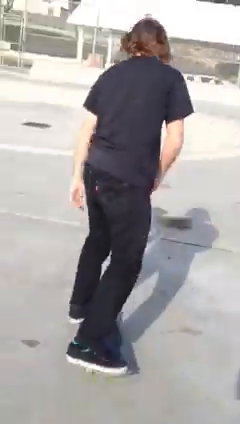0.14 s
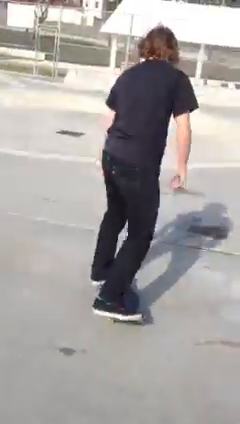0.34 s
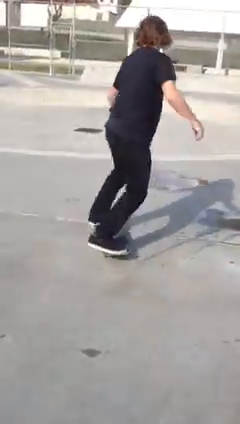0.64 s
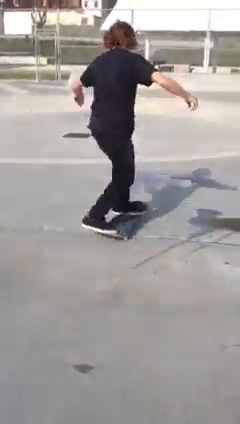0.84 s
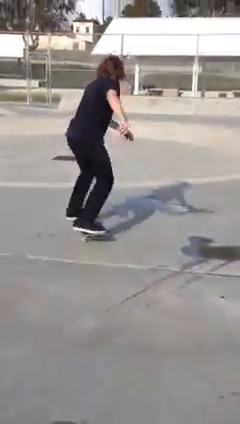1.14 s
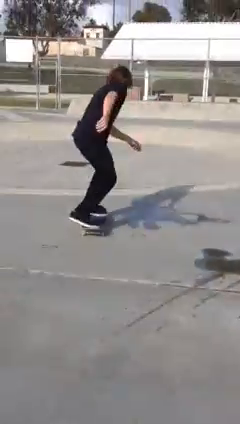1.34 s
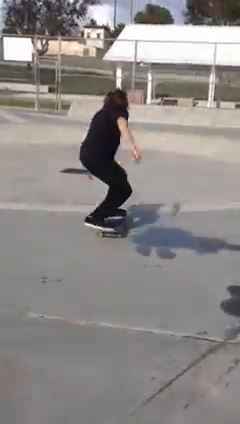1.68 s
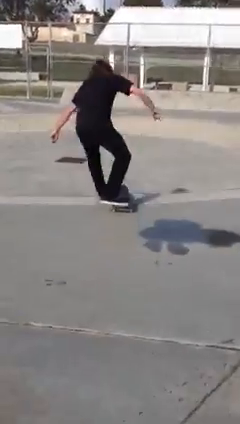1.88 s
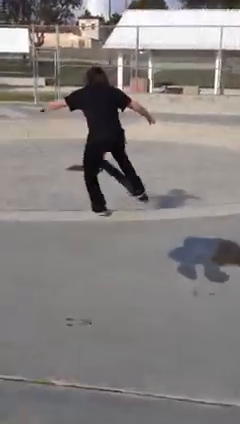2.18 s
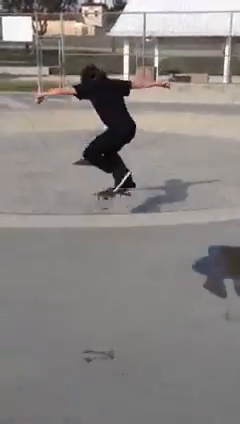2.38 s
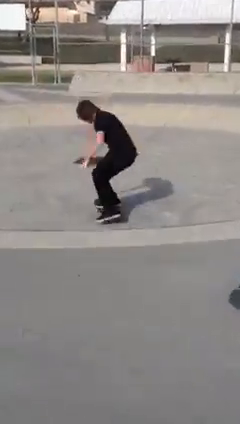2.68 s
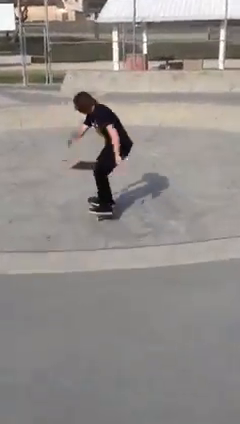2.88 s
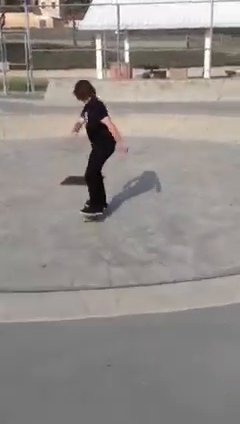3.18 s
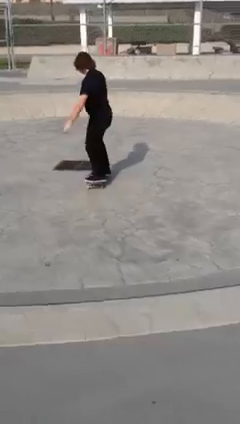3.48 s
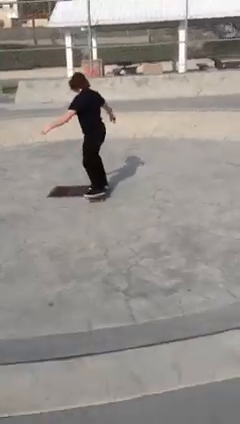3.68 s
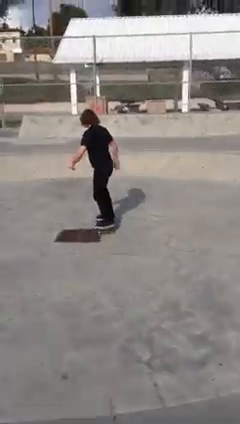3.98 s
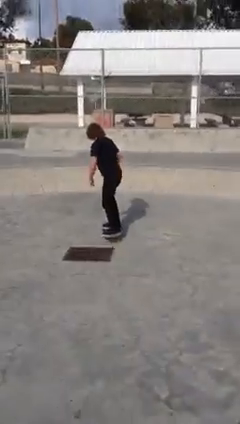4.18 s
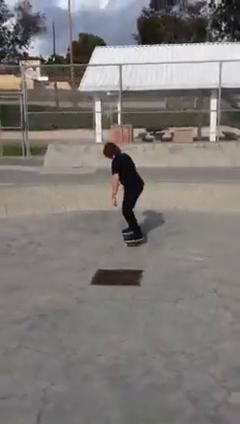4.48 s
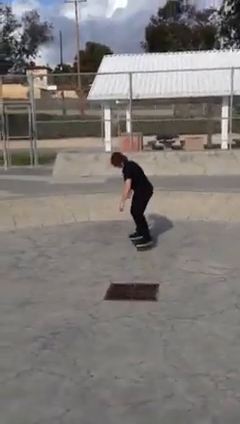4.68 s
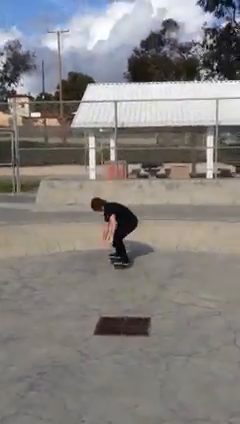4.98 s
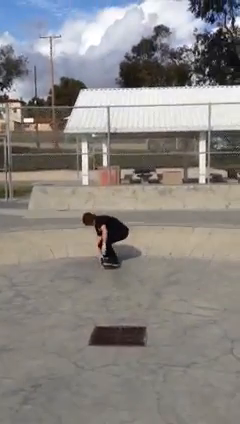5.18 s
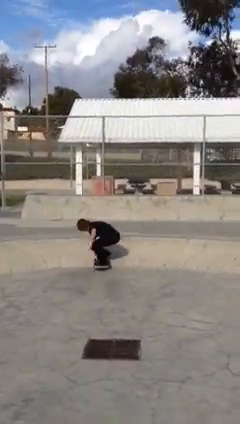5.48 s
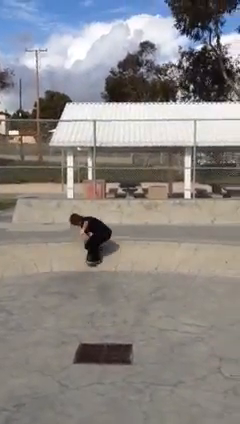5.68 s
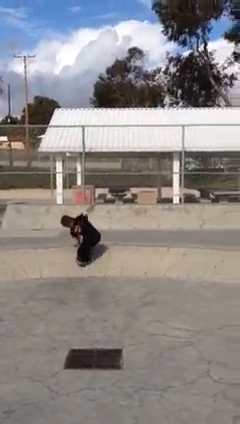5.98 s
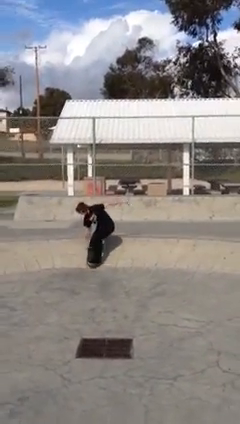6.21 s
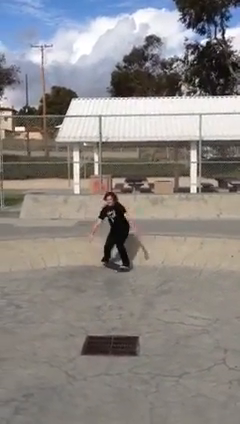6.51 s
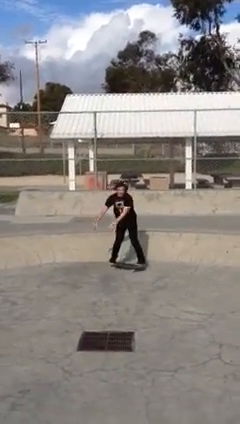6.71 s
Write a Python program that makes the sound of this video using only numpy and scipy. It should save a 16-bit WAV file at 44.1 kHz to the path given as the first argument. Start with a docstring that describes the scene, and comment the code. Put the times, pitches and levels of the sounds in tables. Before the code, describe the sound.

Hard skateboard wheels rumble over concrete, clacking across joints, then a popped trick, a sharp landing, a metallic grate rattle and a fading, skidding turn.

```python
"""Hard wheels rumble on concrete close by, then clack over joints as a skateboard rolls off over a skatepark.
It pops a trick, lands, rattles over a drain grate into a shallow bowl and turns on the far bank, wheels skidding.
The rolling is random grit filtered by surface and deck; each blow is chatter with a few struck modes.
The phone stands in the open: puffs of wind on its microphone, a low outdoor murmur, and faint echo off the banks.
"""
import sys
import numpy as np
from scipy import signal
from scipy.fft import rfft, irfft
from scipy.io import wavfile

SR = 44100
rng = np.random.default_rng(int(sys.argv[2]) if len(sys.argv) > 2 else 0)


def store_pcm(level_fs):
    """Save levels as 16-bit WAV."""
    pcm = np.round(np.clip(level_fs, -1, 1) * 32767).astype(np.int16)
    wavfile.write(sys.argv[1], SR, np.atleast_2d(pcm).T)


N = 302085
TIME = np.arange(N) / SR

# short wind puffs on the microphone: start_s, length_s, level_db
WIND_PUFFS = [(3.089, 0.032, -35), (3.28, 0.11, -39), (3.36, 0.11, -38.5), (3.485, 0.17, -41.5),
              (4.89, 0.046, -42), (5.078, 0.041, -33.5), (5.203, 0.04, -39), (5.246, 0.025, -30),
              (5.798, 0.044, -46), (5.92, 0.11, -54), (6.085, 0.017, -37.5)]
# spectrum of a puff: pitch_hz, level_db
PUFF_SPECTRUM = [(25, -51), (60, -17.5), (110, -1), (170, 0.5), (250, -5.5), (350, -15), (600, -42)]
# distant traffic and breeze: pitch_hz, level_db
AIR_SPECTRUM = [(25, -22), (60, -16), (115, 5), (170, 7.5), (250, -16.5), (350, -27.5), (700, -16.5),
                (1200, -16.5), (2500, -28.5), (6000, -28.5), (15000, -39)]
# colour of the microphone's port: pitch_hz, level_db
PORT_RESPONSE = [(20, -5.5), (4700, 1), (5080, -6.5), (5800, -1), (9400, 5), (10200, -6), (11200, -4),
                 (13000, 1.5), (16000, 4)]
TOP_HZ = 15500
BANK_ECHO_S, BANK_ECHO_DB = 0.047, -25.5  # one distinct reflection from the nearest bank

# turning rate of the wheels, which paces their throb: time_s, turns_per_s
WHEEL_TURNS = [(0, 15), (2.5, 15), (4, 19), (5.2, 17), (6, 4), (6.85, 12)]
# rumble along the ride, shaped by speed, distance and coarseness of slab: time_s, level_db
RUMBLE_LEVEL = [(0, -39), (0.27, -40), (0.43, -47), (0.65, -43), (0.8, -46.5), (1.35, -46.5), (1.5, -44),
                (1.76, -43.5), (2.0, -32.5), (2.25, -34), (3.2, -39.5), (3.55, -34), (3.78, -37),
                (3.97, -47), (4.4, -40), (4.63, -47), (4.95, -42), (5.12, -55.5), (5.7, -50), (6.02, -67.5),
                (6.35, -46.5), (6.85, -57.5)]
# bearing hiss, fading with distance and dying where the board stalls on the bank: time_s, level_db
HISS_LEVEL = [(0, -56.5), (1.3, -54), (1.55, -55.5), (2.3, -58), (2.75, -58.5), (3.4, -56), (4.0, -61.5),
              (5.1, -64.5), (5.7, -63.5), (5.95, -77), (6.13, -69), (6.4, -57.5), (6.85, -61.5)]
# the rider leans and the treads scrub: middle_s, length_s, extra_hiss_db
LEANS_IN = [(0.21, 0.25, 4), (0.667, 0.1, 4), (2.0, 0.57, 4), (3.182, 0.053, 4), (4.24, 0.073, 3.5),
            (4.343, 0.085, 14.5), (4.826, 0.082, 14.5)]
# rumble on the first slab, close to the phone: pitch_hz, level_db
NEAR_RUMBLE = [(170, -37), (215, 3), (250, -3.5), (292, 5.5), (360, -15.5), (445, 8.5), (520, -2.5),
               (590, 7.5), (630, 4), (680, 8), (750, -2.5), (820, -2), (890, 4.5), (1020, 1.5),
               (1130, -2.5), (1480, -3.5), (1800, -15), (2250, -21), (2520, -9), (2700, -34)]
# rumble of wheels and deck on the flat: pitch_hz, level_db
FLAT_RUMBLE = [(290, -28), (385, 6.5), (460, 1), (560, -2), (690, 0.5), (780, 1.5), (860, -8.5), (950, -5),
               (1030, -8.5), (1150, -3), (1400, -13.5), (1800, -23), (2600, -23)]
# rumble on the floor of the bowl: pitch_hz, level_db
BOWL_RUMBLE = [(140, -8), (190, -3.5), (280, -17), (385, 6.5), (480, 6.5), (560, 3.5), (655, 8), (760, 2.5),
               (880, -4.5), (960, 2), (1070, -4), (1240, -2.5), (1450, -8), (1700, -14.5), (1900, -29),
               (2600, -20)]
# middles of the fades from near to flat rumble and from flat to bowl, and the length of each
NEAR_END_S, BOWL_S, SLAB_FADE_S = 1, 3.26, 0.8
# low boom of the deck under the rider: pitch_hz, level_db
BOOM_SPECTRUM = [(60, -91.5), (120, -14), (170, 1), (230, 3.5), (300, 3.5), (360, 0.5), (480, -7.5)]
# grit crushed under the wheels: pitch_hz, level_db
GRIND_SPECTRUM = [(1100, 2.5), (1500, 4), (1750, 5), (1980, -4), (2150, 0.5), (2500, -7.5), (3000, -6.5),
                  (3700, -17), (4600, -7.5), (5600, -24.5)]
# hiss of bearings and wheel treads: pitch_hz, level_db
HISS_SPECTRUM = [(3500, 2.5), (5000, 0), (6400, 1.5), (7500, -3.5), (9000, -5), (10500, -5), (13000, -7),
                 (15500, -19.5)]
# the boom sits below the rumble and swells as the rider loads the deck for the trick
BOOM_DB, CROUCH_S, CROUCH_LENGTH_S, CROUCH_DB = -5, 1.86, 0.38, 6.5
GRIND_DB, GRIND_HISS_SHARE = -3, 0.5  # offset from a level midway between rumble and hiss
HISS_FLUTTER_DB, HISS_FLUTTER_PER_S = 1.1, 35
SURGE_DB, SURGES_PER_S = 1.1, 16  # patches of coarser concrete

# ringing of the spinning bearings: pitch_hz, level_db
WHIRR_SPECTRUM = [(3100, -25), (3400, -8), (3600, -8), (3800, -19.5), (4200, -17), (4550, -12), (4800, -6),
                  (5300, -18)]
WHIRR_S, WHIRR_LENGTH_S, WHIRR_DB = 1.61, 0.4, -52.5  # loudest on the run-up to the trick
# treads scrubbing with a fine, high hiss: start_s, length_s, level_db
TREAD_SCRUBS = [(4.205, 0.04, -63), (4.305, 0.085, -57), (4.785, 0.13, -65)]
# spectrum of the scrub: pitch_hz, level_db
SCRUB_SPECTRUM = [(6000, -18), (10000, -3), (12000, 4), (15000, -3)]
# wheels skidding sideways: start_s, length_s, rasp_level_db, hiss_relative_to_rasp_db
WHEEL_SKIDS = [(2.014, 0.054, -26.5, -33), (2.055, 0.082, -41, -4.5), (5.654, 0.055, -47, -7.5),
               (6.331, 0.058, -46, -7.5), (6.439, 0.07, -40.5, -2), (6.49, 0.07, -51.5, 0)]
# rasp of a skidding wheel: pitch_hz, level_db
RASP_SPECTRUM = [(150, -30), (280, 3), (500, 5.5), (1000, 2), (2000, -4.5), (2800, -14), (4000, -26),
                 (6000, -39)]

# modes of the deck with its trucks: pitch_hz, level_db, t60_s
DECK_MODES = [(228, -10, 0.051), (470, 8, 0.055), (541, -1.5, 0.1), (674, 2, 0.043), (745, 7.5, 0.021),
              (1011, -3.5, 0.12), (1172, -3, 0.12), (1530, 9, 0.033), (1746, 11.5, 0.025),
              (2125, 6.5, 0.02), (2534, 2, 0.078), (2965, -9, 0.086), (3460, 4, 0.09), (4500, 13, 0.032)]
# wheels and tail striking concrete: start_s, body_level_db (over 10 ms), contact_s, main_ring_hz,
# second_ring_hz, second_ring_db (relative to main ring), then thud_db, crack_db, tick_db
# (relative to the body; crack and tick are lowered further by fixed trims in knock)
CONCRETE_BLOWS = [(0.3235, -26, 0.011, 580, 1030, -4, -24, -2, -18),
                  (0.337, -19, 0.0065, 606, 1497, -7, -30, -7.5, -19.5),
                  (0.346, -27, 0.0066, 1460, 700, -11, -10, -2.5, -14),
                  (0.665, -22.5, 0.014, 614, 1250, -2, -10, -4, -12),
                  (0.675, -15.5, 0.0025, 636, 1260, -9.5, -17, -9.5, -19.5),
                  (0.711, -23.5, 0.021, 640, 462, -10, -11, -7.5, -18),
                  (0.8327, -24, 0.007, 1035, 570, -13, -8, -1, -1.5),
                  (0.841, -21, 0.0025, 1570, 1366, -5, -5, -1.5, 0.5),
                  (0.871, -36, 0.003, 903, 1500, -2, -9, -1, -6),
                  (0.9653, -10, 0.006, 549, 2130, -6.5, -9.5, -4.5, -8.5),
                  (1.053, -14, 0.0069, 990, 1500, -3.5, -28, -4.5, -6.5),
                  (1.063, -27.5, 0.011, 485, 723, 6, -12, -2, -1),
                  (1.253, -37, 0.017, 616, 1100, -3, -10, 2.5, -4),
                  (1.2722, -28.5, 0.0018, 1300, 653, -6, -11, -5, -13),
                  (1.413, -24, 0.018, 1030, 690, -3, -17, -4, -9),
                  (1.442, -34.5, 0.002, 1070, 1530, -4, -7, -2, -6),
                  (1.922, -26, 0.0052, 447, 300, 0, -5, -9, -15),
                  (1.963, -23.5, 0.015, 445, 715, -9, -2.5, -11.5, -29),
                  (2.021, -26.5, 0.0087, 594, 1400, -10, -22, -13, -31),
                  (2.045, -20, 0.03, 600, 773, -2, -24, -7, -13),
                  (2.079, -22, 0.0091, 433, 595, -11, -10, -7, -22),
                  (2.0907, -22, 0.01, 980, 1750, -20, -6, 8, -10),
                  (2.148, -25.5, 0.026, 1030, 2870, -16, -15, 1, -8.5),
                  (2.5477, -12, 0.006, 728, 912, -3, -15, -4, -17),
                  (2.5935, -22, 0.012, 684, 940, -8, -9, -4, -6.5),
                  (2.613, -17, 0.011, 910, 332, -1.5, -10, -5, -12.5),
                  (3.132, -36, 0.0083, 373, 915, 1, -10, -14, -8.5),
                  (4.17, -43.5, 0.006, 595, 990, -12, -26, -8.5, -6),
                  (4.905, -39.5, 0.0052, 485, 1110, -4, -9, -2.5, -8),
                  (5.505, -26, 0.005, 397, 1080, -8, -11, -7.5, -14),
                  (5.511, -27, 0.0025, 480, 770, -22, -10, -6, -16),
                  (5.537, -42.5, 0.0089, 500, 1600, -17, -2, -9, -11),
                  (5.671, -23, 0.012, 825, 457, -8, -22, -7.5, -11),
                  (6.029, -58, 0.011, 670, 1190, -8, -15, 5, -1),
                  (6.334, -33.5, 0.0054, 470, 760, 0, -21, -7.5, -4),
                  (6.346, -27.5, 0.008, 776, 425, -4, -18.5, -14, -11),
                  (6.372, -43, 0.01, 670, 990, -3, -13, -8, -3),
                  (6.427, -41, 0.008, 715, 1110, -11, -14, -2, -1),
                  (6.483, -27, 0.011, 495, 406, 1, -10, -2.5, 0.5),
                  (6.513, -40, 0.0044, 607, 1000, -9, -20, -3, 4.5),
                  (6.521, -34, 0.007, 623, 830, -5, -19, -7, -5),
                  (6.837, -28.5, 0.012, 647, 1155, -4, -16, -2.5, 0)]
# wheels dropping on and off the drain grate: same columns
GRATE_BLOWS = [(3.5876, -9.5, 0.0094, 425, 680, -1, -8.5, -9, -23.5),
               (3.603, -14.5, 0.0058, 516, 1210, -1, -4.5, -2, -25),
               (3.632, -16.5, 0.0083, 440, 298, 2, -15, -13, -29),
               (3.641, -21, 0.0052, 605, 278, 4, -22, -7, -24),
               (3.654, -21.5, 0.018, 560, 453, 3, -13, -11, -27),
               (3.739, -33, 0.0073, 380, 940, -1, -12, -4.5, -6),
               (3.816, -27, 0.007, 627, 956, -7, -1, -6.5, -26),
               (3.851, -25.5, 0.0048, 634, 437, -12, -5, -9, -29),
               (3.8777, -18.5, 0.0069, 607, 454, -4, -5, -5.5, -25),
               (3.888, -16.5, 0.0018, 687, 790, -11, -7, -11.5, -34),
               (3.914, -47, 0.006, 624, 445, 22, -9, -11, -9)]
# modes of the iron drain grate: pitch_hz, level_db, t60_s
IRON_MODES = [(298, -4, 0.21), (430, -3, 0.073), (617, -1.5, 0.21), (697, -1, 0.053), (965, 3, 0.083),
              (2130, -8, 0.049)]
GRATE_RING_DB = -7.5  # first grate ring, relative to its blow
GRATE_RING_FADE_DB_PER_S = -23  # the grate rings less as the wheels leave it
# timbre shared by pebbles: second_ring_hz, second_ring_db, thud_db, crack_db, tick_db
PEBBLE_SOUND = (1100, -6, -14, -5, -9)
PEBBLES_PER_S, PEBBLE_DB, PEBBLE_SPREAD_DB = 7, -6, 3  # level relative to the rumble
PEBBLE_CONTACT_S = 0.004
REACH_HZ, REACH_OCTAVES_PER_DB = 2890, 0.04  # a louder crack also reaches higher
# the whole board flexes slowly; its bending modes die fast
THUD_HZ, THUD_T60_S, RING_T60_S = 235, 0.025, 0.029
MID_RING_HZ = 640  # the deck's usual ring
RING_DAMPING = 0.77  # higher bending modes die sooner, by this power of their pitch


def undb(db):
    """Decibels to gain."""
    return 10 ** (np.asarray(db) / 20)


def unit(x):
    """Scale to rms 1."""
    return x / np.sqrt(np.mean(x ** 2) + 1e-20)


def colour(x, points):
    """Filter by a spectrum of (Hz, dB) points, falling away beyond its two ends."""
    hz, db = np.transpose(points)
    f = np.maximum(np.fft.rfftfreq(len(x), 1 / SR), 1)
    gain = undb(np.interp(np.log(f), np.log(hz), db))
    low_end = np.minimum(f / hz[0], 1) ** 2
    high_end = np.minimum(hz[-1] / f, 1) ** 2
    return irfft(rfft(x) * gain * low_end * high_end, len(x))


def band(x, lo_hz, hi_hz, order=3):
    """Causal band-pass."""
    edges = [lo_hz, min(hi_hz, SR / 2 - 1000)]
    return signal.sosfilt(signal.butter(order, edges, "band", fs=SR, output="sos"), x)


def ring(t, hz, t60):
    """One struck mode, of equal energy whatever its decay."""
    decay = np.exp(-np.log(1000) * t / t60)
    return np.sin(2 * np.pi * hz * t) * decay * np.sqrt(4 * np.log(1000) / (t60 * SR))


def bend(t, hz, t60, rise_s):
    """A mode that builds up while the blow pushes on it, at rms 1."""
    return unit(ring(t, hz, t60) * (1 - np.exp(-t / rise_s)))


def walk(rate):
    """Random wander of rms 1, with this many straight steps a second."""
    knots = rng.standard_normal(4096)
    return unit(np.interp(TIME * rate, np.arange(len(knots)), knots))


def grit(spread_db, rate):
    """Dense tiny impacts, mostly small and now and then large."""
    hits = rng.random(N) < rate / SR
    size_db = spread_db * np.minimum(rng.exponential(size=N), 4)
    return hits * rng.standard_normal(N) * undb(size_db)


def curve(points):
    """A control joined by straight lines in time."""
    return np.interp(TIME, *np.transpose(points))


def swell(middle, length):
    """A smooth rise to 1 and back, this long at half height."""
    return np.exp(-(2 * (TIME - middle) / length) ** 2 * np.log(2))


def gate(start, length, edge):
    """A burst with sloping edges."""
    opening = np.clip((TIME - start) / edge + .5, 0, 1)
    return opening * np.clip((start + length - TIME) / edge + .5, 0, 1)


def add(out, start, x):
    """Mix x in at a time."""
    i = int(start * SR)
    out[i:i + len(x)] += x[:max(N - i, 0)]


def wind():
    """Short eddies brush the microphone over the wavering low murmur of the outdoors."""
    puffs = sum(gate(s, length, 0.034) * undb(db) for s, length, db in WIND_PUFFS)
    eddies = unit(colour(rng.standard_normal(N), PUFF_SPECTRUM)) * puffs
    murmur = unit(colour(rng.standard_normal(N), AIR_SPECTRUM)) * undb(-54.5 + 0.4 * walk(1.03))
    return eddies + murmur


def park(x, echo_db, t60, dull_hz):
    """Sparse reflections from the concrete banks, duller than the direct sound."""
    t = np.arange(SR) / SR
    taps = rng.standard_normal(SR) * (rng.random(SR) < .03)
    taps *= np.clip((t - .012) / 0.0064, 0, 1) * np.exp(-np.log(1000) * t / t60)
    taps = band(taps / np.sqrt(np.sum(taps ** 2)), 204, dull_hz, order=1)
    out = x + undb(echo_db) * signal.fftconvolve(x, taps)[:N]
    add(out, BANK_ECHO_S, undb(BANK_ECHO_DB) * band(x, 510, 1050, order=2))
    return out


def treble_lift(x, start_db, end_db):
    """The highest treble of the board is lifted by a gain that drifts slowly over the ride."""
    top = colour(x, [(7000, -40), (9000, -12), (11000, 0), (SR / 2, 0)])
    lift_db = np.interp(TIME, [0, TIME[-1]], [start_db, end_db])
    return x + top * (undb(lift_db) - 1)


def whirr_and_scrub():
    """The bearings ring on the run-up; the treads hiss unevenly as the rider carves across the bowl."""
    whirr = unit(colour(rng.standard_normal(N), WHIRR_SPECTRUM))
    whirr *= undb(WHIRR_DB) * swell(WHIRR_S, WHIRR_LENGTH_S)
    scrub = unit(colour(grit(2.0, 3000), SCRUB_SPECTRUM)) * undb(1.8 * walk(110))
    carves = sum(undb(db) * swell(s + length / 2, length) for s, length, db in TREAD_SCRUBS)
    return whirr + scrub * carves


def slabs():
    """Coarse grains drum on the wheels; each stretch of concrete brings out other resonances."""
    near = np.clip((NEAR_END_S - TIME) / SLAB_FADE_S + .5, 0, 1)
    bowl = np.clip((TIME - BOWL_S) / SLAB_FADE_S + .5, 0, 1)
    flat = np.maximum(1 - near - bowl, 0)
    stretches = (near, NEAR_RUMBLE), (flat, FLAT_RUMBLE), (bowl, BOWL_RUMBLE)
    return sum(np.sqrt(share) * unit(colour(grit(1.5, 2200), points)) for share, points in stretches)


def rolling():
    """Concrete grains drum on the wheels; the load throbs with each wheel turn and wanders with the surface."""
    rumble_db = curve(RUMBLE_LEVEL)
    lean_db = sum(db * swell(s, length) for s, length, db in LEANS_IN)
    hiss_db = curve(HISS_LEVEL) + lean_db + HISS_FLUTTER_DB * walk(HISS_FLUTTER_PER_S)
    boom_db = rumble_db + BOOM_DB + CROUCH_DB * swell(CROUCH_S, CROUCH_LENGTH_S)
    grind_db = rumble_db + GRIND_HISS_SHARE * (hiss_db - rumble_db) + GRIND_DB

    wheel_phase = 2 * np.pi * np.cumsum(curve(WHEEL_TURNS)) / SR
    load_db = .6 * np.sin(wheel_phase) + .6 * walk(90)
    surge_db = SURGE_DB * walk(SURGES_PER_S)

    rumble = slabs() * undb(rumble_db + load_db + surge_db)
    boom = unit(colour(grit(1.4, 3000), BOOM_SPECTRUM)) * undb(boom_db + load_db)
    grind = unit(colour(grit(1.0, 7000), GRIND_SPECTRUM)) * undb(grind_db + load_db + surge_db)
    hiss = unit(colour(grit(2.0, 16000), HISS_SPECTRUM)) * undb(hiss_db + load_db)
    return rumble + boom + grind + hiss


def skids():
    """Urethane sticks and slips over the concrete in uneven jerks."""
    rasp = unit(colour(grit(0.64, 2500), RASP_SPECTRUM))
    hiss = unit(colour(grit(1.8, 9850), HISS_SPECTRUM))
    jerks = undb(3 * walk(190))
    bursts = sum(gate(s, length, 0.017) * undb(db) * (rasp + undb(hiss_db) * hiss)
                 for s, length, db, hiss_db in WHEEL_SKIDS)
    return jerks * bursts


def contact(t, hold_s, fall_s, tail_db, tail_s):
    """Wheels, trucks and deck chatter for some ms with an even, broad spectrum; loose hardware buzzes out."""
    attack = np.minimum(t / 0.0009, 1)
    press = np.exp(-np.maximum(t - hold_s, 0) / fall_s)
    buzz = undb(tail_db) * np.exp(-t / tail_s)
    force = rfft(attack * (press + buzz) * rng.choice([-1., 1.], len(t)))
    evened = irfft(force / (np.abs(force) + 1e-9) ** .7, len(t))
    return evened * attack * np.exp(-t / .03)


def knock(contact_s, ring_hz, second_hz, second_db, thud_db, crack_db, tick_db):
    """One blow: a thud of the deck, its woody ring, the crack of hard wheels and a tick of metal and grit."""
    t = np.arange(SR // 5) / SR
    hold_s = max(contact_s, .002)
    # deck modes vary slightly in pitch at random from blow to blow
    deck = sum(undb(db) * ring(t, hz * (1 + 0.012 * rng.standard_normal()), t60)
               for hz, db, t60 in DECK_MODES)
    chatter = contact(t, .9 * hold_s, fall_s=.0017, tail_db=-17, tail_s=.01)
    deck_reply = signal.fftconvolve(chatter, unit(deck) / np.sqrt(len(t)))[:len(t)]
    wood = chatter + 0.24 * deck_reply
    # where the blow lands decides which two bending modes ring most
    pitches_hz = np.array([ring_hz, second_hz])
    main_t60, second_t60 = RING_T60_S * (MID_RING_HZ / pitches_hz) ** RING_DAMPING
    main_ring = bend(t, ring_hz, main_t60, 0.49 * hold_s)
    second_ring = undb(second_db) * bend(t, second_hz, second_t60, 0.46 * hold_s)
    body = unit(unit(band(wood, 443, 1063)) + 1.35 * (main_ring + second_ring))
    thud = unit(band(bend(t, THUD_HZ, THUD_T60_S, rise_s=0.016), 130, 380, order=2))
    # a harder contact reaches higher modes
    reach_hz = REACH_HZ * 2 ** (REACH_OCTAVES_PER_DB * crack_db)
    crack = unit(band(band(wood, 1513, 7300), 300, reach_hz))
    grains = contact(t, .85 * hold_s, fall_s=.002, tail_db=-16, tail_s=.013)
    tick = unit(band(band(grains, 5000, 14300), 3400, 6360, order=1))
    blow = body + undb(thud_db) * thud + undb(crack_db - 4.14) * crack + undb(tick_db - 6.5) * tick
    return blow * np.sqrt(SR / 100 / len(t))  # level counted over 10 ms


def pebbles():
    """Stray pebbles and hairline cracks tick under the wheels at random, some dB below the rumble."""
    out, rumble_db = np.zeros(N), curve(RUMBLE_LEVEL)
    for when, size, pitch in rng.random((int(PEBBLES_PER_S * N / SR), 3)):
        i = int(when * N)
        db = rumble_db[i] + PEBBLE_DB + PEBBLE_SPREAD_DB * (2 * size - 1)
        ring_hz = MID_RING_HZ * 2 ** (pitch - .5)
        add(out, TIME[i], undb(db) * knock(PEBBLE_CONTACT_S, ring_hz, *PEBBLE_SOUND))
    return out


def grate_ring():
    """The iron bars of the drain grate ring on in slightly detuned modes after one blow."""
    t = np.arange(SR // 3) / SR
    iron = sum(undb(db) * bend(t, hz * (1 + .015 * rng.standard_normal()), t60, .004)
               for hz, db, t60 in IRON_MODES)
    return unit(iron) * np.sqrt(SR / 100 / len(t))  # level counted over 10 ms


def clacks():
    """Joints in the slab, the popped tail, the landings and the turn strike the deck; the grate rings on."""
    out = np.zeros(N)
    for s, db, *timbre in CONCRETE_BLOWS + GRATE_BLOWS:
        add(out, s, undb(db) * knock(*timbre))
    first_s = GRATE_BLOWS[0][0]
    for s, db, *_ in GRATE_BLOWS:
        ring_db = db + GRATE_RING_DB + GRATE_RING_FADE_DB_PER_S * (s - first_s)
        add(out, s, undb(ring_db) * grate_ring())
    return out


def scene():
    """The board and the air around the phone; blows, skids and pebbles echo off the banks, the rolling does not."""
    struck = park(clacks() + skids() + pebbles(), echo_db=-18, t60=0.21, dull_hz=1860)
    board = rolling() + whirr_and_scrub() + struck
    return (treble_lift(board, start_db=0.5, end_db=1) + wind())[None]


def record(dry):
    """The microphone's port colours the sound, the loudest peaks are rounded and the top is cut."""
    heard = np.array([colour(channel, PORT_RESPONSE) for channel in dry])
    ceiling = 0.98
    rounded = ceiling * np.tanh(heard / ceiling)
    return signal.sosfilt(signal.ellip(10, .2, 70, TOP_HZ, fs=SR, output="sos"), rounded)


dry = scene()
out = record(dry)
store_pcm(out)
```